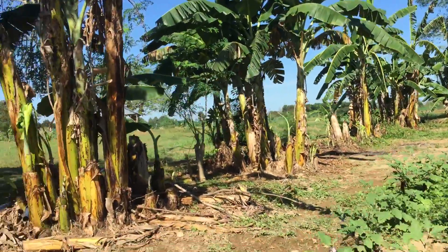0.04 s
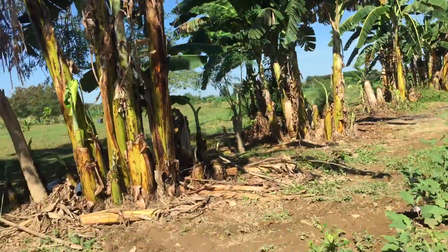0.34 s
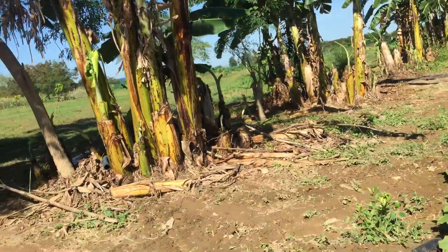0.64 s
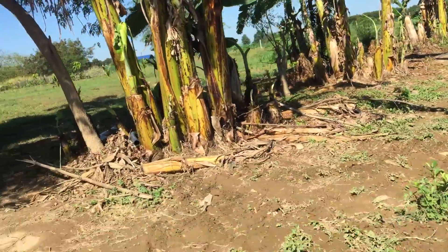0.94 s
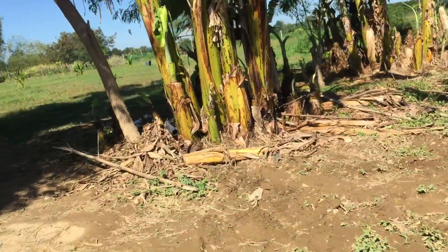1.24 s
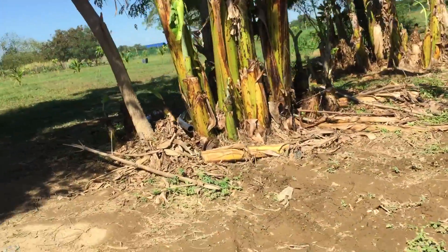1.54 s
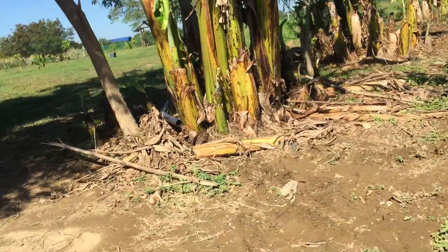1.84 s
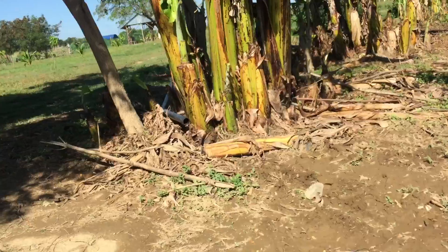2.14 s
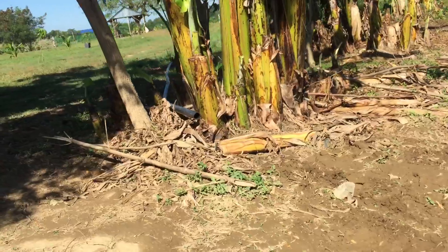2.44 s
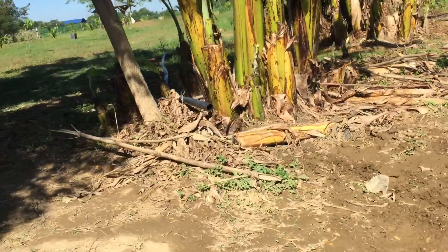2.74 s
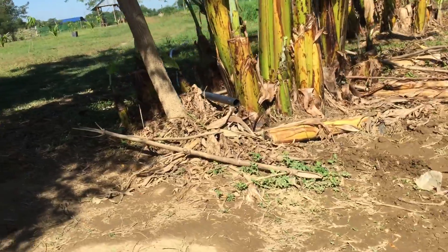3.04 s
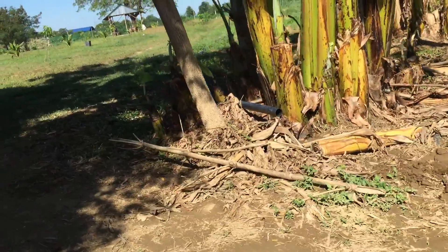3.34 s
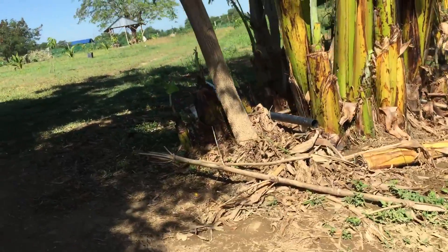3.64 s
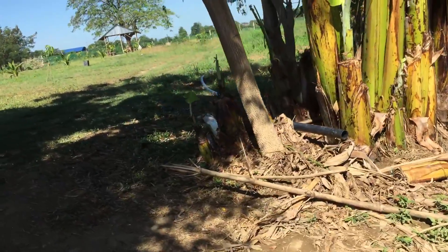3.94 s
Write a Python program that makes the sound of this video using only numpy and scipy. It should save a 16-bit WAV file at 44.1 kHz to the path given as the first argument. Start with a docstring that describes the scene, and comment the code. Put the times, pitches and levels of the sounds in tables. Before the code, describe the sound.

A songbird sings among trees outdoors, after a quiet opening of far-off bird calls and soft crackling leaves. Its quick upward chirps lead into two arching, buzzy phrases close to the microphone, over low wind and a faint wavering hum.

```python
"""Songbird in a grove

A bird gives sharp rising chips, then sings twice: an upslur, a buzzy trill that arches up and down,
a closing upslur. Its syrinx makes a nearly pure tone, modulated in frequency and amplitude, which
trunks and leaves scatter. Other birds call far off, dry leaves crackle in bursts of noise, and light
wind rumbles over a low wavering hum."""
import sys
import numpy as np
from scipy import signal
from scipy.fft import rfft, irfft, next_fast_len
from scipy.io import wavfile
from scipy.ndimage import map_coordinates

SR = 44100
rng = np.random.default_rng(int(sys.argv[2]) if len(sys.argv) > 2 else 0)


def file_out(sig):
    """Save sig as 16-bit WAV at sys.argv[1]."""
    # one column per channel
    cols = np.atleast_2d(sig).T
    # limit, then scale
    lim = np.clip(cols, -1, 1)
    pcm = np.round(lim * 32767).astype(np.int16)
    wavfile.write(sys.argv[1], SR, pcm)


N = 176400


def near_bird():
    """Source and filter: the resonances of throat and beak colour the notes of the syrinx."""
    beak = [(1500, -0.5), (4300, 1), (4900, -6.5), (5600, -9), (6400, -7), (7200, 0.5), (7900, -14),
            (9000, -4), (10000, 0.5), (11700, -3.5), (12800, -2), (14200, -4), (15500, -10)]  # frequency_hz, gain_db
    return colour(slurs() + trills(), beak)


def slurs():
    """Frequency glides: each note shoots up in pitch, then levels off."""
    # start_s, length_s, start_hz, end_hz, rise_s, relative_level_db, roughness (0-1)
    notes = [(2.433, .012, 3000, 3500, .005, -55, .9), (2.443, .015, 2200, 4250, .013, -48, .5),
             (2.630, .012, 2600, 2800, .004, -54, .3), (2.663, .013, 2600, 3650, .008, -53, .9),
             (2.674, .016, 2600, 4450, .015, -43, .35), (3.450, .014, 2650, 3550, .008, -47, .8),
             (3.460, .019, 2500, 4250, .016, -39, .45), (2.901, .007, 3900, 5200, .006, -50, .5),
             (3.685, .008, 3800, 5000, .007, -49, .8), (2.905, .013, 2200, 3700, .006, -35, .1),
             (3.687, .026, 2100, 3560, .010, -37, .15), (3.716, .013, 3400, 3560, .005, -37, .15),
             (3.152, .015, 1750, 2300, .014, -39, .1), (3.166, .010, 2350, 2700, .009, -25, .05),
             (3.175, .011, 2750, 2980, .007, -32, .05), (3.948, .012, 1750, 2300, .011, -32, .05),
             (3.958, .046, 2300, 2880, .013, -34, .05)]
    out = np.zeros(N)
    for start_s, length_s, start_hz, end_hz, rise_s, db, roughness in notes:
        t = times(length_s)
        glide = np.sin(np.pi / 2 * np.clip(t / rise_s, 0, 1)) ** 1.416
        hz = start_hz + (end_hz - start_hz) * glide
        envelope = amp(db - 5.5) * gate(t, 0.39 * length_s, 0.28 * length_s)
        add(out, start_s, envelope * syrinx(hz, roughness))
    return out


def trills():
    """Amplitude and frequency modulation: some 65 falling pulses a second buzz along an arch of pitch."""
    arches = [
        [(2.932, 1695, -53), (2.942, 1780, -53), (2.953, 2652, -33.5), (2.986, 3520, -39), (3.016, 3727, -38),
         (3.060, 3272, -28.5), (3.078, 2936, -28.5), (3.108, 2256, -35.5), (3.127, 1725, -42),
         (3.151, 1620, -49)],
        [(3.715, 1830, -33), (3.724, 1864, -46), (3.737, 2650, -33.5), (3.754, 2923, -32), (3.772, 3370, -37.5),
         (3.822, 3652, -36), (3.858, 3418, -29.5), (3.894, 2606, -31), (3.925, 1798, -36), (3.949, 1390, -51)],
    ]  # for each trill: time_s, pitch_hz, relative_level_db
    pulses = [(2.954, .01545), (3.738, .01555)]  # peak_time_s, period_s
    dip_db = 26  # between pulses
    out = np.zeros(N)
    for arch, (peak_s, period_s) in zip(arches, pulses):
        time_s, pitch_hz, db = np.transpose(arch)
        t = times(time_s[-1] - time_s[0])
        now_s = time_s[0] + t
        pulse_phase = 2 * np.pi * (now_s - peak_s) / period_s
        swoop = np.linspace(0.13, 0.23, len(t))  # fractional pitch fall within a pulse
        hz = np.interp(now_s, time_s, pitch_hz) * (1 - swoop / 2 * np.sin(pulse_phase))
        peak_db = np.interp(now_s, time_s, db) + 1
        envelope = amp(peak_db - dip_db * (1 - np.cos(pulse_phase)) / 2)
        add(out, time_s[0], envelope * gate(t, 0.0033, 0.003) * syrinx(hz))
    return out


def syrinx(hz, roughness=0):
    """An oscillator with weak harmonics; roughness adds jitter and the half-orders of period doubling."""
    overtones = [(2, -28), (3, -40), (4, -45.5), (5, -46)]  # harmonic_number, level_db
    jitter = 0.016 * wobble(605.5, len(hz)) + roughness * 0.098 * wobble(1700, len(hz))
    phase = 2 * np.pi * np.cumsum(hz * (1 + jitter)) / SR
    tone = np.sin(phase) + sum(amp(db) * np.sin(k * phase) for k, db in overtones)
    half_orders = np.sin(phase / 2) + np.sin(1.5 * phase)
    return np.sqrt(2) * (tone + 0.49 * roughness ** 2 * half_orders)


def grove(voice):
    """Scattering: trunks and leaves follow the direct sound with bright early echoes and a long tail."""
    scatter_tilt = [(1500, 4), (3000, 2.5), (4200, 8.5), (7000, 9.5)]  # leaves throw back more treble: frequency_hz, gain_db
    direct_tilt = [(3000, 1.5), (4200, -2.5), (6500, 3)]  # and shade a band of the direct sound: frequency_hz, gain_db
    early = amp(-4.5) * reverberation(colour(voice, scatter_tilt), t60_s=0.21, onset_s=0.0017)
    late = amp(-15.5) * reverberation(voice, t60_s=0.87, onset_s=0.013)
    return colour(voice, direct_tilt) + early + late


def reverberation(x, t60_s, onset_s):
    """Convolution with a diffuse impulse response: echoes build up, then decay exponentially."""
    t = times(1)
    build_up = 1 - np.exp(-(t / onset_s) ** 2)
    tail = rng.standard_normal(SR) * amp(-60 * t / t60_s) * build_up
    return signal.fftconvolve(x, tail / np.linalg.norm(tail))[:N]


def far_birds():
    """Whistles and hoarse calls of formant-shaped noise, made faint and reverberant by distance."""
    whistles = [(0.034, 0.044, 1886, 1873, 1910, -61.5), (0.093, 0.029, 1470, 1850, 1810, -57.5),
                (0.106, 0.021, 2740, 2750, 2680, -57), (0.112, 0.036, 1302, 1518, 1470, -54.5),
                (.183, 0.025, 2850, 2840, 2840, -63), (0.226, 0.025, 1890, 1795, 1800, -55.5),
                (0.751, .035, 2280, 2765, 2100, -56), (1.22, .025, 3340, 3730, 3700, -62),
                (1.257, 0.12, 4090, 3760, 3700, -66.5), (1.645, 0.044, 3390, 3180, 3000, -70),
                (1.863, 0.024, 3120, 3400, 3300, -64), (2.219, 0.027, 1946, 1938, 1830, -51),
                (2.300, 0.035, 1770, 1475, 1500, -53), (2.437, 0.054, 1210, 1283, 1300, -56),
                (2.483, 0.069, 1344, 1370, 1350, -60), (2.863, 0.028, 1920, 2750, 2120, -56),
                (2.891, 0.016, 2280, 2130, 2030, -49)]  # start_s, length_s, start_hz, middle_hz, end_hz, relative_level_db
    caws = [(0.055, 0.19, -60.5), (0.685, 0.12, -51)]  # start_s, length_s, relative_level_db
    formants = [(300, -26), (800, -5), (980, 8.5), (1100, 2), (1300, -2.5), (1500, 1), (1660, 8),
                (1850, -7.5), (2100, -7), (4000, -35), (8000, -68)]  # frequency_hz, gain_db
    tones, caw_envelope = np.zeros(N), np.zeros(N)
    for start_s, length_s, start_hz, middle_hz, end_hz, db in whistles:
        t = times(length_s)
        hz = np.interp(t, [0, length_s / 2, length_s], [start_hz, middle_hz, end_hz])
        add(tones, start_s, amp(db) * gate(t, 0.003, 0.0094) * syrinx(hz, roughness=0.075))
    for start_s, length_s, db in caws:
        add(caw_envelope, start_s, amp(db) * gate(times(length_s), 0.0056, 0.03))
    calls = amp(-7) * (tones + caw_envelope * noise(formants))
    return calls + amp(-3.5) * reverberation(calls, t60_s=0.76, onset_s=0.0033)


def leaves():
    """Noise transients: grainy crackles of dry litter, duller rustles and soft low bumps."""
    crackles = [(.520, .008, -51, -58), (1.02, .04, -72, -66), (1.557, .008, -57, -70),
                (1.57, .03, -66, -68), (2.076, .016, -62, -63), (2.192, .004, -53, -75),
                (2.392, .003, -58, -64)]  # centre_s, width_s, body_db, crunch_db
    # centre_s, width_s, level_db
    rustles = [(.2, 0.7, -71.5), (1.1, 0.6, -70.5), (1.31, 0.059, -71), (1.57, 0.027, -66),
               (1.72, 0.28, -70)]
    bumps = [(.455, 0.011, -60), (.72, 0.0089, -52), (2.54, 0.0099, -55), (2.72, 0.052, -54.5),
             (3.18, 0.018, -53), (3.35, .06, -63)]
    # frequency_hz, gain_db
    body_spectrum = [(300, -20), (1000, 1), (1800, 7.5), (4000, 3.5), (6000, -7), (15000, -35)]
    crunch_spectrum = [(1500, -25), (4500, -3.5), (8000, -4.5), (15000, -12.5)]
    rustle_spectrum = [(200, -21), (500, -0.5), (1000, -3.5), (1600, -6), (3000, -19.5), (8000, -32),
                       (15000, -44)]
    bump_spectrum = [(60, -37), (150, -0.5), (220, -4.5), (400, -10), (800, -31.5), (2000, -90)]
    body = swells([(s, width, db) for s, width, db, _ in crackles])
    body *= grainy_noise(body_spectrum, depth_db=4.2, rate_hz=500)
    crunch = swells([(s, width, db) for s, width, _, db in crackles])
    crunch *= grainy_noise(crunch_spectrum, depth_db=1.9, rate_hz=500)
    rustle = swells(rustles) * grainy_noise(rustle_spectrum, depth_db=2.4, rate_hz=120)
    return body + crunch + rustle + swells(bumps) * noise(bump_spectrum)


def wind():
    """Turbulence: a low rumble whose level fluctuates at random about slow gusts."""
    gusts = [(0, -61), (.5, -62.5), (1.3, -61.5), (1.5, -60.5), (2.08, -63.5), (2.2, -56), (2.7, -58.5),
             (3.3, -56), (3.65, -60.5), (4, -55.5)]  # time_s, relative_level_db
    spectrum = [(20, -36), (30, -29), (42, -3), (60, 3.5), (85, 0), (130, -1), (180, -8), (260, -12.5),
                (400, -19), (800, -44), (2000, -100)]  # frequency_hz, gain_db
    return level(gusts) * amp(4 + 2.1 * wobble(20)) * noise(spectrum)


def hum():
    """Random modulation: a low tone and its octave waver together in pitch, separately in level."""
    contour = [(0, -58.5), (.7, -56.5), (1.0, -54), (1.65, -55), (1.85, -64), (2.05, -60), (2.25, -59),
               (2.8, -49.5), (4, -54)]  # time_s, level_db
    pitch_hz, waver_hz = 59.9, 3.416
    phase = 2 * np.pi * np.cumsum(pitch_hz + waver_hz * wobble(14)) / SR
    fundamental = amp(1.7 * wobble(12)) * np.sin(phase)
    octave = amp(-9 + 1.6 * wobble(10)) * np.sin(2 * phase)
    return np.sqrt(2) * level(contour) * (fundamental + octave)


def air():
    """The ambient noise floor: nearly steady broadband noise and a narrow band of high hiss."""
    spectrum = [(120, -15), (250, 2), (450, -3.5), (700, -4), (1000, -5), (1500, -9.5), (2200, -8.5),
                (3800, -12.5), (5500, -16.5), (7500, -19), (9500, -20), (10400, -31), (12500, -25),
                (15500, -25.5)]  # frequency_hz, gain_db
    hiss_hz, width_hz = 11270, 1100
    broadband = amp(-66 + 0.23 * wobble(5.22)) * noise(spectrum)
    hiss = filtered(rng.standard_normal(N), lambda hz: np.exp(-((hz - hiss_hz) / width_hz) ** 2))
    return broadband + amp(-82) * unit(hiss)


def amp(db):
    """Decibels to amplitude ratio."""
    return 10 ** (np.asarray(db) / 20)


def unit(x):
    """Normalisation to rms 1."""
    return x / np.sqrt(np.mean(x ** 2) + 1e-20)


def times(length_s):
    """Sampling instants in seconds."""
    return np.arange(int(length_s * SR)) / SR


def wobble(rate_hz, size=N):
    """Smooth random modulation: a spline through rate_hz random values a second."""
    knots = rng.standard_normal(int(size * rate_hz / SR) + 4)
    return map_coordinates(knots, [np.arange(size) * rate_hz / SR])


def filtered(x, response):
    """Zero-phase filtering: the spectrum of x times a function of frequency."""
    size = next_fast_len(N + SR // 2)
    return irfft(rfft(x, size) * response(np.fft.rfftfreq(size, 1 / SR)), size)[:N]


def colour(x, spectrum):
    """Spectral shaping by (frequency_hz, gain_db) points joined on a log frequency axis."""
    frequency_hz, gain_db = np.transpose(spectrum)
    return filtered(x, lambda hz: amp(np.interp(np.log(hz + 1), np.log(frequency_hz), gain_db)))


def noise(spectrum):
    """Coloured Gaussian noise of rms 1."""
    return unit(colour(rng.standard_normal(N), spectrum))


def grainy_noise(spectrum, depth_db, rate_hz):
    """Fast random amplitude modulation breaks noise into grains; rms 1."""
    return unit(noise(spectrum) * amp(depth_db * wobble(rate_hz)))


def level(contour):
    """An amplitude envelope through (time_s, level_db) points."""
    return amp(np.interp(np.arange(N) / SR, *np.transpose(contour)))


def swells(rows):
    """A sum of Gaussian envelopes from (centre_s, width_s, level_db) rows."""
    t = np.arange(N) / SR
    return sum(amp(db) * np.exp(-2 * ((t - centre_s) / width_s) ** 2) for centre_s, width_s, db in rows)


def gate(t, attack_s, release_s):
    """A flat envelope with quarter-sine edges."""
    attack = np.sin(np.pi / 2 * np.clip(t / attack_s, 0, 1))
    release = np.sin(np.pi / 2 * np.clip((t[-1] - t) / release_s, 0, 1))
    return attack * release


def add(out, start_s, x):
    """Superpose x on out from start_s."""
    part = out[max(round(start_s * SR), 0):][:len(x)]
    part += x[:len(part)]


def scene():
    """Superposition: the near bird, its echoes and the background sum in one channel."""
    return (grove(near_bird()) + far_birds() + leaves() + air() + wind() + hum())[None]


def record(dry):
    """Band limiting: an ideal low-pass filter removes the highest treble."""
    cutoff_hz = 15750
    return filtered(dry[0], lambda hz: hz < cutoff_hz)[None]


dry = scene()
out = record(dry)
file_out(out)
```